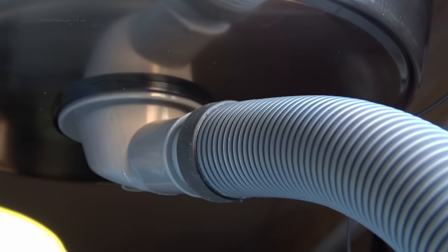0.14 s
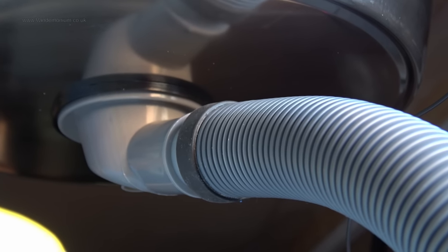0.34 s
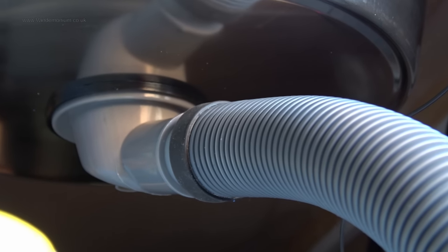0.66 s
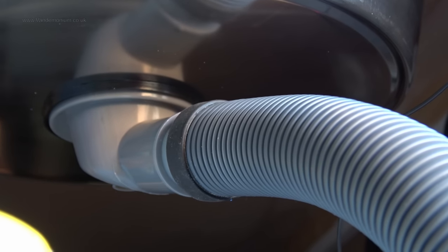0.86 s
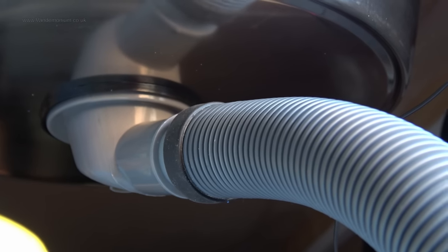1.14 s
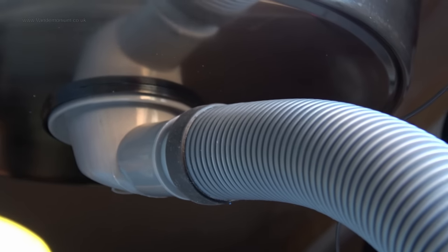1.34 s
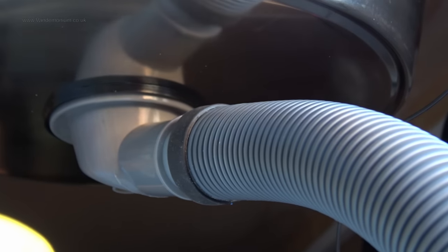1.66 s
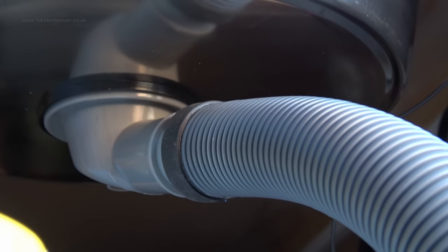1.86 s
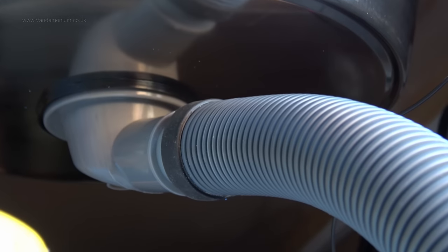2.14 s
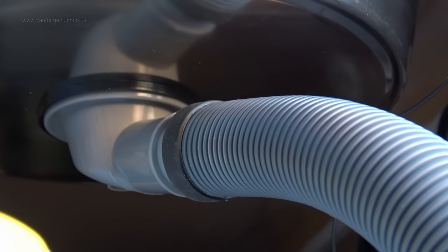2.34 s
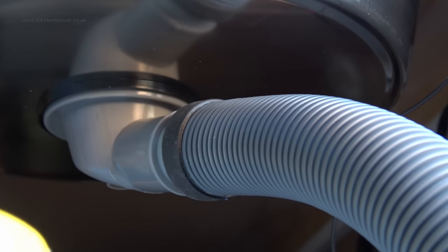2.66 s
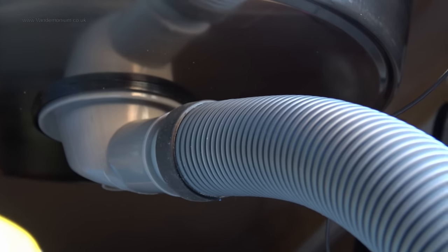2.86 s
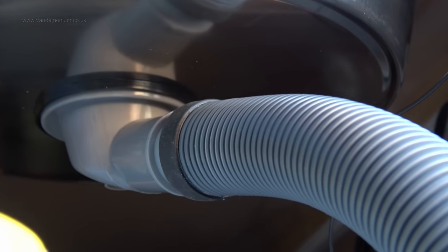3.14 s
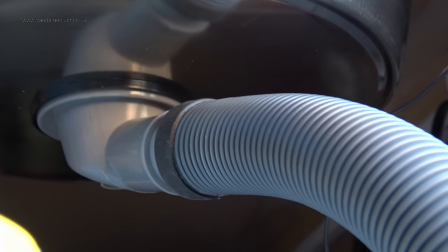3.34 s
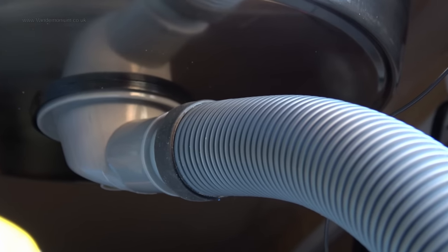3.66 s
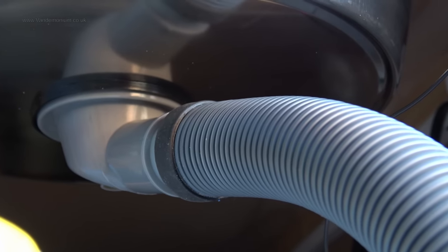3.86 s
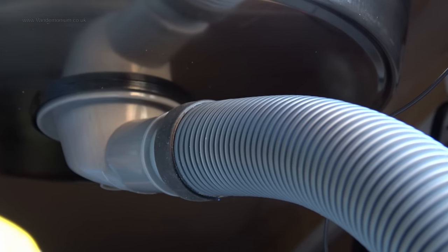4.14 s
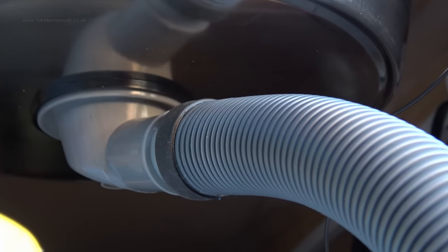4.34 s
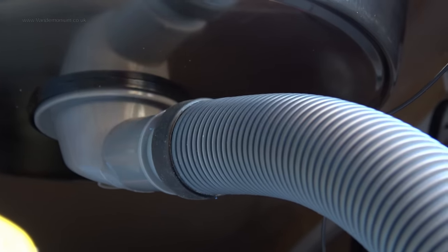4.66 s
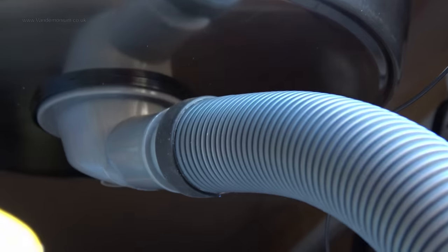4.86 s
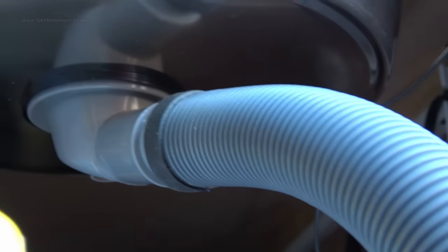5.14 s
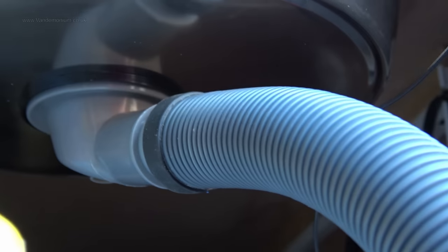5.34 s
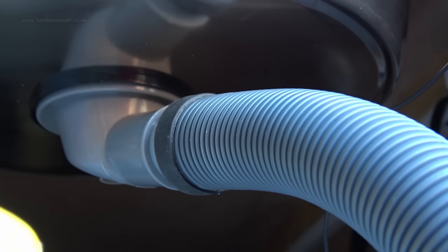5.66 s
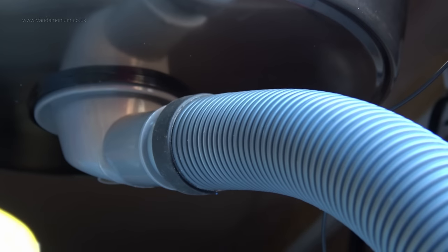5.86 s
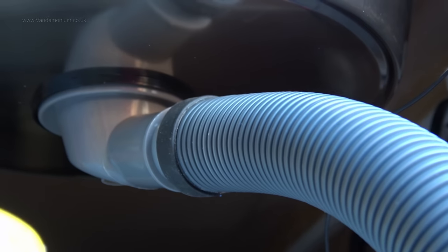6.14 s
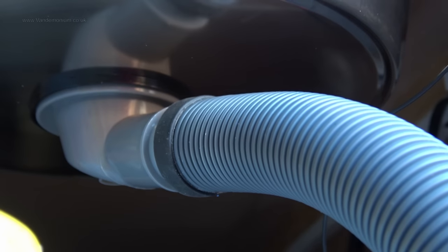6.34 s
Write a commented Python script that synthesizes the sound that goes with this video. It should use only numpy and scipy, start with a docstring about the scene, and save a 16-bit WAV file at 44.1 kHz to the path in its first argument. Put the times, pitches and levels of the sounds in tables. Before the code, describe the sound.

Water rushes and splashes out of a sink through the trap and a ribbed plastic hose, with a low, hollow hum. The flow soon thins to a spattering trickle, then air is sucked through in irregular, bubbly gulps. One loud gurgle comes just past the middle, and smaller clusters follow. The microphone is close to the pipes, inside the cupboard under the sink.

```python
"""Inside the cupboard under a sink, close to the trap and a ribbed plastic hose, water rushes out.
The turbulent rush thins; then air is sucked through the trap in gulps, each pocket ringing as a
resonator, with splashes and spray between them. These sounds excite the air and wall resonances
of the pipework, while sloshing water sets the hose humming. The close walls add a short
reverberation, over a faint room noise."""
import sys
import numpy as np
from scipy import signal
from scipy.io import wavfile
from scipy.ndimage import uniform_filter1d

SR = 44100
rng = np.random.default_rng(int(sys.argv[2]) if len(sys.argv) > 2 else 0)


def unload_wav(signal):
    """Save mono or channel-first audio to the path in sys.argv[1] as 16-bit WAV at rate SR, clipped to [-1, 1]."""
    wavfile.write(
        sys.argv[1],
        SR,
        np.round(np.clip(np.atleast_2d(signal).T, -1, 1) * 32767).astype(np.int16),
    )


N = 286367


def gain_of(db):
    """Amplitude ratio of a level in decibels."""
    return 10 ** (np.asarray(db) / 20)


def unit_rms(x):
    """Normalisation to unit mean power."""
    return x / np.sqrt(np.mean(x ** 2) + 1e-20)


def unit_peak(x):
    """Normalisation by short-time power: the loudest few milliseconds peak near 1."""
    return x / np.sqrt(3 * uniform_filter1d(x ** 2, size=300).max())


def smoothed(x, span):
    """Low-pass filtering by two moving averages of span samples."""
    return uniform_filter1d(uniform_filter1d(x, span), span)


def add(mix, start_s, sound):
    """Superposition of a sound on the mix."""
    part = mix[round(start_s * SR):][:len(sound)]
    part += sound[:len(part)]


def resonate(x, hz, *widths_hz):
    """Damped resonance by heterodyning (shift to zero, smooth, shift back), in series for each width."""
    turn = np.exp(2j * np.pi * np.cumsum(hz * np.ones(len(x))) / SR)
    for width in widths_hz:
        pole = np.exp(-np.pi * width / SR)
        x = 2 * (turn * signal.lfilter([1 - pole], [1, -pole], x / turn)).real
    return x


def noise(spectrum, patchy_db, flicker_db):
    """Modulated noise: random short-time spectra with drifting patches and a broadband flicker."""
    frames, hz = N // 128 + 5, np.fft.rfftfreq(512, 1 / SR)
    real, imag, patches = rng.standard_normal((frames, 257, 3)).T
    patches = unit_rms(uniform_filter1d(uniform_filter1d(patches, size=7, axis=0), size=10, axis=1))
    flicker = unit_rms(uniform_filter1d(rng.standard_normal(frames), size=8))
    knots_hz, knots_db = np.transpose(spectrum)
    colour_db = np.interp(np.log(hz + 1), np.log(knots_hz + 1), knots_db)[:, None]
    spectra = (real + 1j * imag) * gain_of(colour_db + patchy_db * patches + flicker_db * flicker)
    return unit_rms(signal.istft(spectra, nperseg=512, noverlap=384)[1][:N])


def envelope(seconds, rise_s):
    """A transient's quick rise, exponential sag and short close, cut off at 4096 samples at most."""
    t = np.arange(int(np.clip(seconds * 1.2 * SR, 300, 4096))) / SR
    attack = np.sin(np.pi / 2 * np.minimum(t / rise_s, 1)) ** 2
    return attack * np.exp(-1.2 * t / seconds) / (1 + (t / seconds) ** 8)


def burst(seconds, rise_s, pops_per_s, turbulence):
    """Transient excitation: shot noise over turbulence, then silence in which a resonator can decay."""
    shape = envelope(seconds, rise_s)
    chance, size, eddies = rng.random((3, 4096))[:, :len(shape)]
    pops = (chance < pops_per_s / SR) * (size - .5) * np.sqrt(SR / pops_per_s)
    return np.pad((pops + turbulence * (eddies - .5)) * shape, (0, 900))


# Spectrum of the room noise. Each row: frequency in Hz, relative spectral density in dB.
ROOM_SPECTRUM = [(15, -82), (25, -19), (188, -13), (553, 16.5), (632, -31), (784, -1), (897, -35.5),
                 (1080, 8), (1860, -1), (15600, -9)]

def room_noise():
    """The ambient noise floor: faint, broadband and nearly stationary."""
    return gain_of(-70) * noise(ROOM_SPECTRUM, patchy_db=.6, flicker_db=.3)


def cupboard(x, reverb_s=0.11):
    """Reverberation: dense reflections from the close walls, decaying exponentially."""
    t = np.arange(6000) / SR
    taps = rng.choice([-1., 1.], len(t)) * (rng.random(len(t)) < .06)
    taps *= gain_of(-60 * t / reverb_s) * (t > .001)
    return gain_of(-11) * signal.oaconvolve(x, taps / np.linalg.norm(taps))[:N]


# Modes of the air in the trap. Each row: frequency in Hz, width in Hz, gain in dB re the direct path.
TRAP_MODES = [(320, 60, -5), (645, 55, 4), (895, 70, 5)]
# Their tuning, which sinks as the water falls. Each row: time in seconds, factor on frequency.
TRAP_TUNING = [(0, 1.07), (3.2, 1.1), (3.85, 1.045), (4.05, 0.992), (6.49, 0.98)]
# Modes of the pipes. Each row: frequency in Hz, width in Hz, gain in dB re the direct path.
PIPE_MODES = [(144, 22, 3), (207, 18, 0), (318, 30, 0), (422, 28, 3), (462, 26, -3), (540, 28, -1),
              (634, 22, 6), (740, 26, 2), (830, 28, 0), (950, 30, -1), (1019, 28, -1), (1263, 30, 1),
              (1375, 30, -3), (1500, 24, 1), (1700, 30, 4), (2053, 30, 0), (2668, 32, 2), (3154, 35, 0),
              (3600, 60, 0), (3899, 45, -2), (4641, 45, 1), (5280, 50, -4)]

def pipework(x):
    """Modal filtering: the changing air space of the trap, then the constant modes of the pipes."""
    tuning = np.interp(np.arange(N) / SR, *np.transpose(TRAP_TUNING))
    x = x + sum(gain_of(db) * resonate(x, hz * tuning, width) for hz, width, db in TRAP_MODES)
    click = signal.unit_impulse(8192)
    response = click + sum(gain_of(db) * resonate(click, hz, width) for hz, width, db in PIPE_MODES)
    return gain_of(-8.5) * signal.oaconvolve(x, response)[:N]


# Strength of the stream. Each row: time in seconds, wash gain in dB, fizz gain in dB.
STREAM_LEVELS = [(0.0, -39.5, -40), (0.4, -43, -39), (0.7, -45.5, -47.5), (0.87, -43.5, -40),
                 (0.96, -45.5, -44), (1.2, -46, -57), (1.66, -55.5, -67), (1.9, -50.5, -64),
                 (2.129, -52, -68), (2.42, -49.5, -56), (2.55, -47.5, -69), (2.68, -47.5, -57.5),
                 (3.05, -49, -67.5), (3.44, -54, -63), (3.5, -52, -86), (3.66, -44, -68),
                 (3.84, -48.5, -88), (3.9, -51, -39.5), (4.14, -52.5, -58.5), (4.23, -52, -70),
                 (5.2, -49, -67), (6.49, -52.5, -80.5)]

def flow_gains():
    """Amplitude modulation by the flow: one curve for the low wash, one for the bright fizz."""
    times, wash_db, fizz_db = np.transpose(STREAM_LEVELS)
    return [gain_of(np.interp(np.arange(N) / SR, times, db)) for db in (wash_db, fizz_db)]


def hose_hum():
    """Forced vibration: random sloshing drives a narrow hum and a broad rumble in the hose."""
    slosh = rng.standard_normal(N)
    hum = unit_rms(resonate(slosh, 203, 14, 61))
    rumble = unit_rms(resonate(resonate(slosh, 184, 108), 146, 160))
    return gain_of(-20.5) * hum + gain_of(-15) * rumble


# Slugs of water in the hose. Each row: centre time in seconds, level in dB, half length in seconds.
SLUGS = [(0.01, -38.5, 0.01), (0.157, -46, 0.0067), (0.299, -36, 0.0079), (0.545, -51, 0.071),
         (0.696, -42.5, 0.063), (0.945, -72, 0.024), (3.033, -71, 0.024), (3.639, -42.5, 0.042),
         (3.835, -61, 0.024), (5.745, -48, 0.015), (5.926, -53, 0.014)]

def hose_swells(hz=207.7, waver_hz=2.5, rough_db=2.5):
    """Modulation of a hose resonance: each passing slug swells a hollow, wavering, lumpy tone."""
    t = np.arange(N) / SR
    waver = unit_rms(smoothed(rng.standard_normal(N), 1500))
    lumps = unit_rms(smoothed(rng.standard_normal(N), 500))
    tone = np.sqrt(2) * np.sin(2 * np.pi * np.cumsum(hz + waver_hz * waver) / SR)
    swell = sum(gain_of(db) * np.exp(-((t - centre) / half) ** 2) for centre, db, half in SLUGS)
    return tone * gain_of(rough_db * lumps) * swell


def droplets(low_hz, high_hz, per_s, seconds, breadth, spread_db):
    """Shot noise of tiny splashes: random puffs in 20 bands, per_s in each, most of them faint."""
    out, t = np.zeros(N), np.arange(2200) / SR
    for hz in np.geomspace(low_hz, high_hz, num=20):
        size = gain_of(spread_db * np.minimum(rng.exponential(1, N), 4))
        hits = size * (rng.random(N) < per_s / SR)
        puff = rng.standard_normal(len(t)) * np.minimum(t / 0.001, 1) * np.exp(-(t / seconds) ** 2)
        puff = unit_rms(resonate(puff, hz, breadth * hz, 2 * breadth * hz))
        # higher drops are smaller; more drops at once share the same power
        out += signal.oaconvolve(hits / np.sqrt(per_s), puff * (low_hz / hz) ** .5)[:N]
    return unit_rms(out)


# Spectra of the low wash and bright fizz. Each row: frequency in Hz, relative spectral density in dB.
WASH_SPECTRUM = [(180, -6.5), (300, -2.5), (412, 4), (472, -5), (694, -3.5), (794, -3.5), (991, -10),
                 (1260, -8), (3000, -22), (3900, -83), (6600, -120)]
FIZZ_SPECTRUM = [(1120, -35), (1900, -77), (2310, 6.5), (3170, -18.5), (3640, -17), (4380, 5), (5050, 7),
                 (5910, -10), (11600, -2), (15600, -13)]

def stream(wash_gain, fizz_gain, air):
    """Turbulent flow noise with droplets; each gulp of air shoves the water into a low surge."""
    crowd = 1 + 2.8 * np.minimum(fizz_gain / gain_of(-53.5), 1)  # a strong stream throws more drops
    burble = droplets(322, 1665, per_s=2.5 * crowd, seconds=0.015, breadth=0.21, spread_db=3.8)
    patter = droplets(2654, 9500, per_s=2.2 * crowd ** 2, seconds=0.005, breadth=0.2, spread_db=3.2)
    trickle = droplets(2200, 12500, per_s=3.5, seconds=0.007, breadth=0.22, spread_db=2.8)
    wash = gain_of(-7) * noise(WASH_SPECTRUM, patchy_db=2.6, flicker_db=2.6) + gain_of(-12) * burble
    fizz = gain_of(-7.5) * noise(FIZZ_SPECTRUM, patchy_db=3, flicker_db=4.2) + gain_of(-4) * patter
    gulp_rms = np.sqrt(abs(smoothed(air ** 2, round(0.0082 * SR))))
    low_wash = signal.sosfilt(signal.butter(2, 1170, fs=SR, output="sos"), wash)
    surge = gain_of(-9) * gulp_rms * low_wash
    return wash_gain * wash + surge + fizz_gain * fizz + gain_of(-66.5) * trickle


# Water slapping and spraying. Each row: start in seconds, level in dB, pitch in Hz,
# nominal length in seconds, relative level of the fine spray in dB.
WATER_SLAPS = [(0.047, -32, 5900, 0.024, -18), (0.1, -26, 4940, 0.012, -12),
               (0.121, -35.5, 4500, 0.029, -7), (0.184, -30, 5400, 0.012, -17),
               (0.197, -33, 5700, 0.014, -6), (0.218, -38, 4300, 0.01, -29), (0.282, -61, 4270, 0.1, 20.5),
               (0.342, -37, 4800, 0.044, -9), (0.368, -34, 5700, 0.012, 2.5),
               (0.449, -30.5, 3360, 0.017, -19), (0.473, -28, 3780, 0.0071, -20),
               (0.513, -25.5, 4140, 0.019, -25), (0.578, -46, 6500, 0.01, -15),
               (0.659, -41, 5400, 0.12, -8), (0.692, -31.5, 4400, 0.028, -15),
               (0.73, -42.5, 3800, 0.034, -5), (0.801, -33, 4800, 0.019, -27),
               (0.838, -33, 4470, 0.054, -30), (0.862, -24, 2800, 0.0055, -19),
               (0.915, -33, 2980, 0.023, -19), (0.975, -40.5, 4460, 0.039, -7),
               (1.068, -39.5, 3940, 0.041, -6), (1.073, -42.5, 8800, .008, -30),
               (1.117, -42.5, 2660, 0.055, -6), (1.135, -38, 4900, 0.028, -22),
               (1.184, -36.5, 3420, 0.036, -11), (1.244, -34.5, 4800, 0.043, -11),
               (1.296, -36, 4300, 0.047, -6.5), (1.321, -40, 2050, 0.026, -10),
               (1.395, -45.5, 2900, 0.029, -4.5), (1.432, -39, 3120, 0.025, -16),
               (1.489, -45, 4530, 0.039, -8), (1.557, -56, 5000, 0.0078, -7), (1.606, -58, 2660, .02, -25),
               (1.629, -58, 5070, 0.0095, -25), (1.68, -53, 3540, 0.014, -26),
               (1.686, -57, 4470, .015, -25), (1.751, -56, 4830, 0.017, -16),
               (1.784, -48, 2430, 0.018, -28), (1.83, -58, 6000, .01, -8), (1.911, -54, 3900, 0.023, -19),
               (1.976, -51.5, 6400, 0.024, 1), (2.055, -51, 2270, 0.031, -25),
               (2.099, -55, 3380, .015, -13), (2.165, -50, 2890, 0.021, -25),
               (2.209, -44, 2350, 0.057, -27), (2.287, -40, 3300, 0.021, -14),
               (2.324, -41.5, 2480, 0.037, -1), (2.395, -44.5, 2100, 0.033, -19),
               (2.41, -55, 9900, 0.018, -20), (2.466, -45, 5240, 0.048, 1), (2.504, -52, 13600, 0.031, -1),
               (2.556, -56, 6950, 0.025, -12), (2.584, -55, 10000, 0.026, -10),
               (2.62, -57, 4500, 0.018, -20), (2.646, -53.5, 4450, 0.019, -20),
               (2.691, -53, 5300, 0.048, 0), (2.771, -41.5, 3660, 0.03, -11),
               (2.807, -42, 4440, 0.035, -5.5), (2.861, -54.5, 3640, 0.034, -25),
               (3.054, -48.5, 4330, 0.033, -3.5), (3.095, -43.5, 6300, 0.015, -11),
               (3.114, -44, 6660, 0.02, -6), (3.134, -47.5, 4050, 0.029, -23),
               (3.199, -33, 2940, 0.038, -18), (3.236, -40, 6400, 0.028, -25),
               (3.265, -40.5, 3850, 0.03, -16), (3.309, -47.5, 2220, 0.042, -30),
               (3.338, -45, 5430, 0.024, -16), (3.461, -40.5, 2280, 0.045, -37),
               (3.468, -48, 4280, 0.072, -32), (3.517, -46, 4200, 0.11, -11),
               (3.553, -37, 13700, 0.058, -27), (3.561, -31.5, 4930, 0.02, -12),
               (3.583, -24, 5200, 0.053, -11.5), (3.578, -15.5, 3560, 0.0072, -12),
               (3.584, -23, 2650, 0.074, -33), (3.665, -35, 4560, 0.031, -7),
               (3.695, -48, 4260, 0.088, -25), (3.696, -59, 13500, 0.0093, -25),
               (3.724, -45.5, 3540, 0.033, -12), (3.774, -42.5, 2720, 0.027, -15),
               (3.791, -38.5, 4400, 0.055, -30), (3.824, -55, 10600, .02, -25),
               (3.876, -44, 4280, 0.064, -6), (3.909, -35, 4160, 0.045, -5), (3.931, -30, 4460, 0.022, -22),
               (3.991, -40, 4440, 0.022, -8), (4.024, -35, 3570, 0.04, -11),
               (4.055, -30, 4780, 0.057, -4.5), (4.275, -46, 6800, 0.031, -29),
               (4.312, -50, 7300, 0.022, -30), (4.314, -50, 2420, 0.031, -27),
               (4.34, -41, 2420, 0.027, -22), (4.483, -55, 5840, 0.027, -6), (4.584, -63, 4760, .022, 4),
               (4.615, -60, 9850, .015, -28), (4.701, -41, 4440, 0.028, -18),
               (4.782, -57, 6500, 0.0099, -25), (4.786, -54, 3970, 0.026, -25),
               (4.866, -45.5, 4180, 0.035, -6), (4.903, -42, 2900, 0.036, -27),
               (4.928, -45, 3180, 0.019, -30), (4.929, -44, 2270, 0.021, -30), (4.929, -64, 7440, .02, -25),
               (5.018, -47, 7800, 0.034, -3), (5.126, -42.5, 6850, 0.028, -16),
               (5.18, -50.5, 7950, 0.019, -16), (5.21, -46, 7650, 0.015, -8),
               (5.284, -50.5, 4770, 0.01, -71), (5.31, -63, 5160, 0.0087, -24),
               (5.326, -52, 5330, .021, -25), (5.382, -59, 4000, 0.011, -25), (5.426, -57, 3150, 0.02, -25),
               (5.462, -59, 8100, .012, -25), (5.507, -51.5, 3670, 0.058, -9),
               (5.631, -52.5, 8000, 0.031, -25), (5.664, -50.5, 4400, 0.058, -22),
               (5.712, -44, 5650, 0.029, -31), (5.774, -61, 7700, .008, -20),
               (5.824, -49, 2580, 0.023, -25), (5.872, -58, 4400, 0.037, -20),
               (5.911, -46, 4670, 0.029, -29), (5.967, -45, 4860, 0.015, -15),
               (6.025, -58, 4550, 0.016, -20), (6.145, -58, 3400, 0.018, -24),
               (6.175, -58, 7500, 0.0076, -22), (6.261, -55, 11600, 0.032, -30),
               (6.267, -61, 3500, 0.012, -15), (6.353, -55, 11200, 0.022, -25),
               (6.42, -54, 4400, 0.015, -11)]

def splashes():
    """Bubble resonance: small bubbles ring around one pitch, one clearly, while fine spray hisses."""
    out = np.zeros(N)
    spray_band = signal.butter(1, [6000, 13000], "band", fs=SR, output="sos")
    for start, db, hz, seconds, spray_db in WATER_SLAPS:
        drive = burst(seconds, rise_s=0.0055, pops_per_s=1500, turbulence=1.6)
        ring = resonate(drive, hz, 0.4 * hz, 0.9 * hz, 1.6 * hz)
        ping_hz = hz * (1 + .05 * rng.standard_normal())
        ping = resonate(drive, ping_hz, 0.1 * hz, 0.2 * hz)
        bubbles = unit_peak(unit_peak(ring) + .3 * unit_peak(ping))
        spray = signal.sosfilt(spray_band, burst(seconds, rise_s=0.011, pops_per_s=2000, turbulence=3.9))
        spray += gain_of(-7.5) * resonate(spray, rng.uniform(6000, 12000), 500)  # clumps at one pitch
        add(out, start, gain_of(db) * (bubbles + gain_of(spray_db) * unit_peak(spray)))
    return out


# Air breaking through the trap. Each row: start in seconds, level in dB, starting pitch in Hz,
# nominal length in seconds, fall of pitch over that length in octaves (negative for a rise).
AIR_POCKETS = [(0.036, -39.5, 780, 0.029, 2.5), (0.114, -35, 608, 0.041, 1.5),
               (0.136, -39, 1623, 0.019, -0.4), (0.236, -35, 710, 0.0041, 1.5),
               (0.349, -39, 355, 0.057, 0.75), (0.367, -47.5, 1390, 0.21, 0), (0.855, -49, 438, 0.028, -2),
               (0.867, -36, 2380, 0.019, 0.5), (0.973, -44.5, 693, 0.023, -0.1),
               (1.184, -49, 596, 0.018, 1), (1.276, -42, 390, 0.08, 1.5), (1.396, -42.5, 614, 0.023, 1.5),
               (1.511, -47.5, 1044, 0.019, -0.5), (1.664, -49, 910, 0.026, 0.36),
               (1.842, -52, 960, 0.07, 0.5), (1.867, -41, 1020, 0.044, 1.04),
               (2.06, -47.5, 700, 0.013, -0.8), (2.211, -40.5, 705, 0.027, 0.6),
               (2.213, -37.5, 1408, 0.054, 0.04), (2.401, -43.5, 1220, 0.023, 1.1),
               (2.458, -48, 645, 0.02, 1), (2.509, -59, 340, 0.011, -0.5), (2.624, -42.5, 367, 0.025, 0.1),
               (2.692, -45, 350, 0.013, -1.1), (2.764, -46, 934, 0.033, -0.1),
               (2.947, -47, 685, 0.02, -0.4), (2.994, -38, 696, 0.024, 0), (3.013, -29, 660, 0.024, 0.2),
               (3.024, -28, 340, 0.03, 0.7), (3.048, -33, 597, 0.017, 0.57),
               (3.085, -30.5, 654, 0.052, 1.44), (3.14, -27.5, 665, 0.019, 0.1),
               (3.146, -30, 325, 0.026, 0.03), (3.169, -39.5, 730, 0.019, -0.1),
               (3.204, -37, 780, 0.026, 0), (3.273, -35, 906, 0.07, 1.14), (3.303, -26.5, 1030, 0.018, 0.3),
               (3.316, -31, 723, 0.014, 0.2), (3.387, -44, 1340, 0.027, 0.9),
               (3.433, -33.5, 811, 0.033, 0.86), (3.481, -38, 1564, 0.064, 0.8),
               (3.522, -41, 835, 0.054, 0.058), (3.578, -18.5, 760, 0.04, 2.3),
               (3.581, -17.5, 1294, 0.03, 0), (3.594, -25, 437, 0.04, -0.47), (3.597, -24, 685, 0.078, 0.6),
               (3.603, -24.5, 151, 0.051, 0.5), (3.631, -29.5, 1550, 0.08, .6),
               (3.658, -36.5, 707, 0.081, -0.5), (3.701, -38.5, 724, 0.062, 0.4),
               (3.734, -35.5, 664, 0.042, 0), (3.809, -25.5, 870, 0.026, 1), (3.882, -50, 952, 0.034, 0.3),
               (3.939, -39, 587, 0.054, 1), (4.021, -47.5, 857, 0.057, 1), (4.067, -39, 617, 0.045, 0.5),
               (4.114, -37, 830, 0.026, -0.5), (4.149, -41.5, 860, 0.023, 0),
               (4.223, -39.5, 1550, 0.052, 0.05), (4.241, -37.5, 1490, 0.022, 1.5),
               (4.264, -35.5, 832, 0.029, 0), (4.338, -38, 876, 0.037, 0), (4.654, -44.5, 884, 0.029, -0.3),
               (4.701, -41, 965, 0.067, 0.1), (4.797, -33.5, 946, 0.012, -1.1),
               (4.806, -28, 930, 0.024, 1.43), (4.834, -31, 687, 0.044, 1), (4.784, -44, 1660, 0.055, 0.5),
               (4.883, -33.5, 1390, 0.032, 0.48), (4.898, -34.5, 1244, 0.058, 0.46),
               (4.956, -38.5, 676, 0.018, 0), (5.022, -39.5, 700, 0.033, 2),
               (5.138, -33.5, 745, 0.0099, 0.5), (5.246, -40.5, 677, 0.026, 1.6),
               (5.472, -37, 680, 0.017, 1.06), (5.675, -36.5, 1048, 0.07, 1.1),
               (5.71, -27, 936, 0.023, 1.1), (5.723, -35, 643, 0.059, -0.2), (5.736, -27, 445, 0.04, 0.96),
               (5.788, -42.5, 1710, 0.058, -0.5), (5.82, -53, 1690, 0.031, -1),
               (5.816, -36, 520, 0.028, 0.5), (5.833, -36, 846, 0.015, 0.7),
               (5.969, -45.5, 1700, 0.039, 0.8), (6.004, -30.5, 926, 0.032, 0.44),
               (6.014, -33, 660, 0.017, 0.8), (6.038, -44, 1170, 0.025, -0.3),
               (6.049, -29.5, 505, 0.065, 1), (6.09, -33.5, 857, 0.021, 0), (6.095, -28, 635, 0.021, 0.4),
               (6.152, -44, 950, 0.044, 1.6), (6.192, -41, 685, 0.024, 0), (6.297, -41, 650, 0.028, -0.5),
               (6.35, -49.5, 830, 0.029, -0.5), (6.401, -47, 586, 0.033, -0.5), (6.443, -45, 613, 0.019, 0),
               (6.444, -55, 2140, 0.015, -0.5)]

def gulps(rise_s=0.0045):
    """Cavity resonance: each air pocket rings at its own pitch, which sinks if the pocket grows."""
    out = np.zeros(N)
    for start, db, hz, seconds, fall in AIR_POCKETS:
        drive = burst(seconds, rise_s, pops_per_s=500, turbulence=1.0)
        t = np.arange(len(drive)) / SR
        glide_hz = hz * .5 ** (fall * np.minimum(t / seconds, 1.5))
        width_hz = 290 + .27 * max(fall, 0) * hz  # a sinking pocket rings less cleanly
        ring = resonate(drive, glide_hz, width_hz, 0.55 * hz, 0.6 * hz)
        ring = np.gradient(ring) / glide_hz  # a small pocket radiates little below its own pitch
        column_hz = hz * (glide_hz / hz) ** .25  # the air column's clean tone glides a quarter as far
        column = np.sin(2 * np.pi * np.cumsum(column_hz) / SR) * np.pad(envelope(seconds, rise_s), (0, 900))
        add(out, start, gain_of(db) * unit_peak(unit_peak(ring) + .27 * unit_peak(column)))
    return out


def scene():
    """Source and filter: water and air sound through the pipework; hose, walls and room add to it."""
    wash_gain, fizz_gain = flow_gains()
    air = gulps()
    hum = wash_gain * hose_hum()
    water = stream(wash_gain, fizz_gain, air)
    hose = hum + hose_swells()
    near = pipework(water + air + splashes()) + hose
    return (near + cupboard(near) + room_noise())[None]


def record(dry):
    """Band limiting: the small microphone loses the deep bass, and a steep low-pass ends the treble."""
    thin = signal.sosfilt(signal.butter(5, 118, "high", fs=SR, output="sos"), dry)
    low_pass = signal.firwin(2047, 15725, window=("kaiser", 10), fs=SR)
    return signal.oaconvolve(thin, low_pass[None], "same")


dry = scene()
out = record(dry)
unload_wav(out)
```